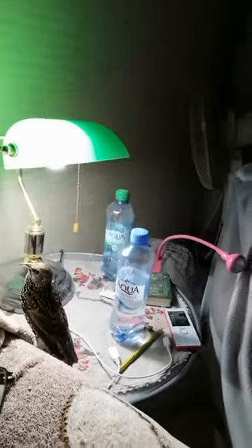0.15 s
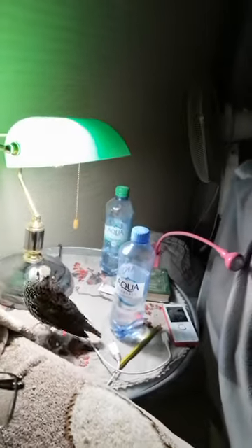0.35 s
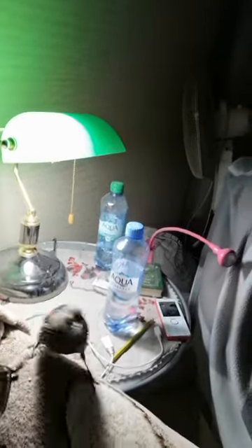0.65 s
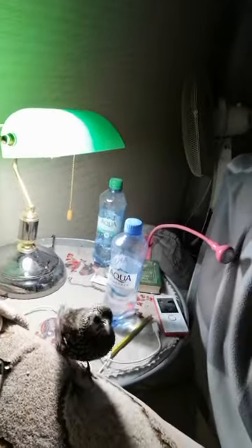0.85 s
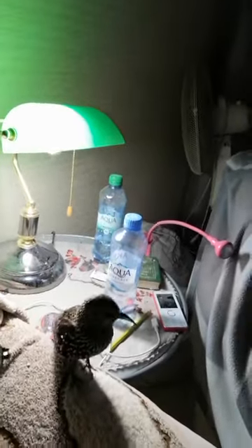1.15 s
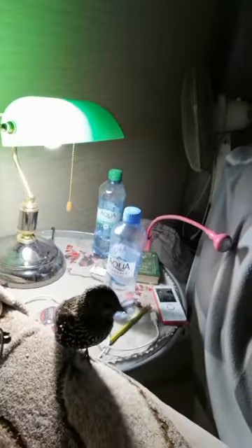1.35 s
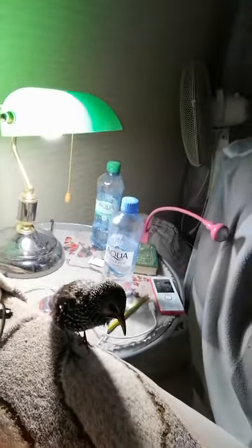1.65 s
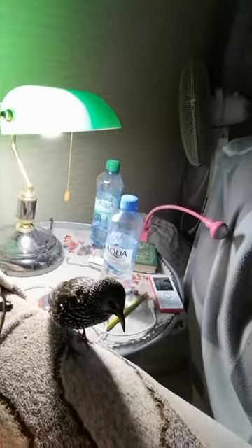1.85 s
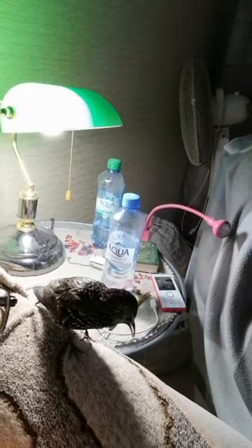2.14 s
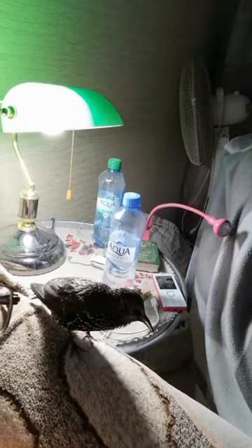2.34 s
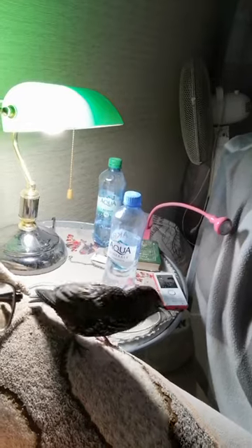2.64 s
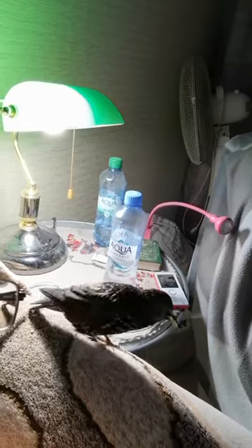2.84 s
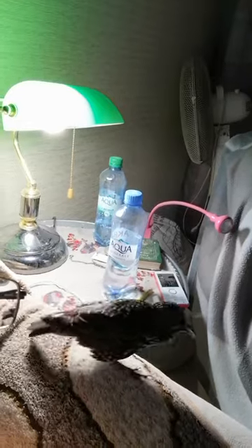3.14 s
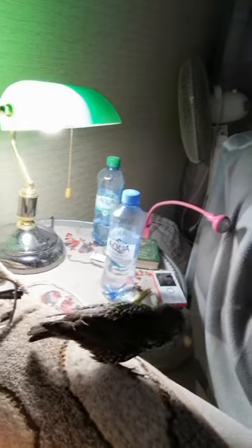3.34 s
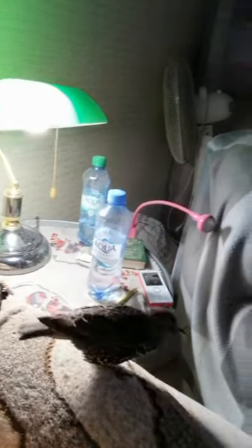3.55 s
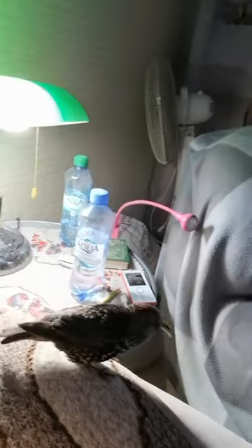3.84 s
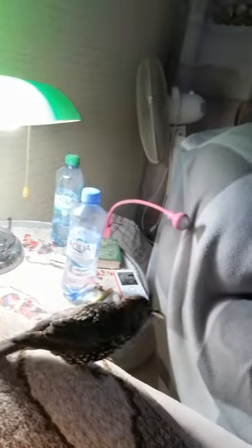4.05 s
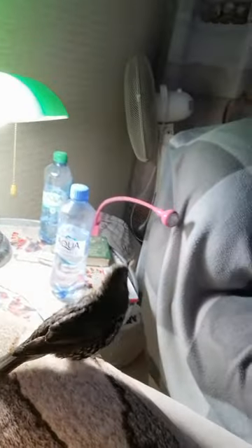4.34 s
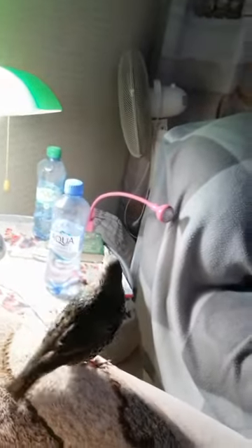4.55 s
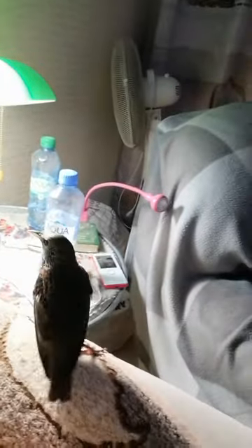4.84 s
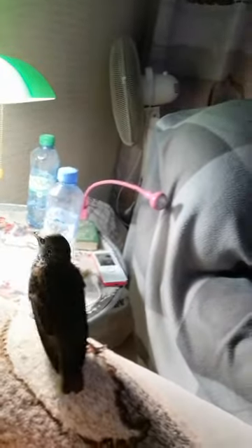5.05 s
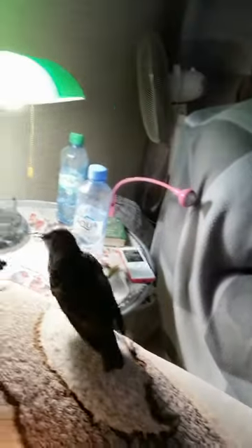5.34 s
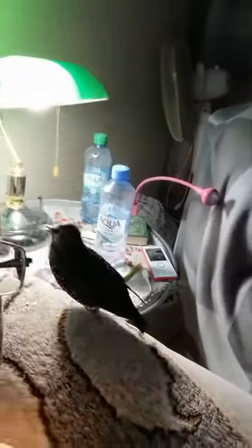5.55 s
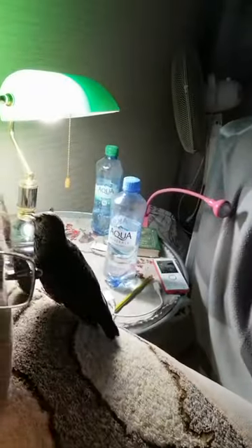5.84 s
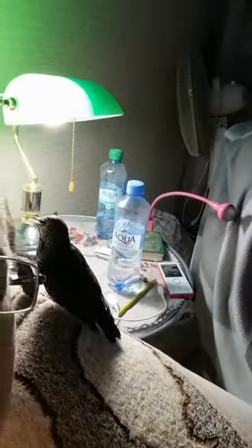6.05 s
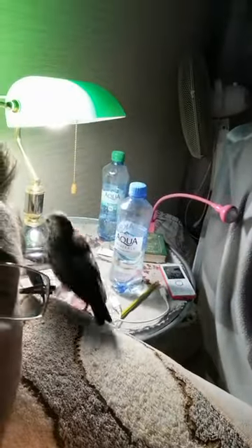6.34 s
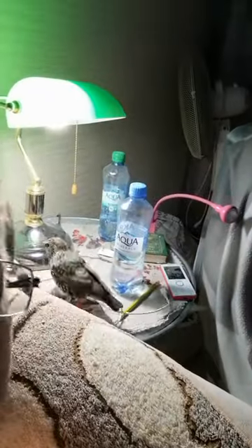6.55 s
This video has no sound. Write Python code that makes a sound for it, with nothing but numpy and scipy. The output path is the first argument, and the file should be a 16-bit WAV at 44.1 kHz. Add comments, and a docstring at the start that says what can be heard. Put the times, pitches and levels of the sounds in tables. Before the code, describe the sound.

A starling sings close to the microphone, toward the left, in a small furnished room with a brief echo and very faint hum. It starts with a fast run of falling chirps over raspy hiss, then husky slurs and spitting hisses until about 1 second. Two clear, high whistles follow at about 1.3 and 1.7 seconds. From 2 seconds come quick ticks, small pips and a low reedy babble, then a bright rising slur near 2.6. The loudest stretch, from about 2.7 to 4.5 seconds, is a string of rapid swooping warbles broken by short dry rattles. The song drops to soft hiss with a few ticks around 4.8. Two more warbles come at about 5.2 and 5.8 seconds, with a last rattle near 6. Thin, quiet, husky high glides trail on until about 6.8 seconds.

```python
"""A pet starling sings on a sofa arm in a small furnished room, close to the left microphone port.
The oscillating membrane of its syrinx, filtered by the throat, gives two long whistles, reedy babble and
seven warbles built of hooks, scoops, climbs, crests and soft undertones. Between them come husky slurs,
swept chirps and ticks, band-filtered hiss, and dry rattles whose puffs excite resonances of the beak.
The room hums faintly and reverberates briefly. Table levels are relative, before gains and filters."""
import sys
import numpy as np
from scipy import signal
from scipy.fft import rfft, irfft, next_fast_len
from scipy.io import wavfile
from scipy.ndimage import uniform_filter1d, map_coordinates

SR = 44100
rng = np.random.default_rng(int(sys.argv[2]) if len(sys.argv) > 2 else 0)


def file_out(sig):
    """Save sig as 16-bit WAV at sys.argv[1]."""
    # one column per channel
    cols = np.atleast_2d(sig).T
    # limit, then scale
    lim = np.clip(cols, -1, 1)
    pcm = np.round(lim * 32767).astype(np.int16)
    wavfile.write(sys.argv[1], SR, pcm)


N = 295459

# Contours of the two long whistles, each a list of: t/s, f/Hz, level/dB
WHISTLES = [
    [(1.343, 3330, -39), (1.357, 2963, -30.5), (1.379, 2827, -23.5), (1.447, 2730, -26.5),
     (1.513, 2790, -25.5), (1.521, 2927, -30.5), (1.561, 2970, -48), (1.57, 2980, -44)],
    [(1.665, 3300, -36), (1.677, 3120, -32.5), (1.703, 2820, -22.5), (1.729, 2720, -20),
     (1.803, 2619, -25.5), (1.855, 2708, -30), (1.885, 2675, -34.5), (1.905, 2920, -45)],
]
# Short arched pips: t/s, duration/s, top f/Hz, level/dB
PIPS = [(2.191, 0.0133, 2660, -37), (2.239, 0.014, 2874, -31.5), (2.289, 0.0142, 2800, -23.5),
        (2.419, 0.03, 7970, -37.5), (5.754, 0.034, 8620, -44)]
# Thin glides near the end: t/s, duration/s, start f/Hz, end f/Hz, level/dB
THIN_GLIDES = [(6.355, .14, 4564, 4400, -46.5), (6.358, 0.038, 3450, 3170, -53.5)]
def whistles():
    """Nearly sinusoidal oscillation: weak harmonics and little jitter give a pure tone."""
    notes = list(WHISTLES) + [arch(*row) for row in PIPS] + [slur(*row) for row in THIN_GLIDES]
    return amp(5.5) * syrinx(notes, [-38, -40], jitter=.002, jitter_rate=400, shimmer_db=.4)


# High hooks that open a warble, one (10070 Hz at 5.149 s) sounding an octave above the hook beside it: t/s,
# duration/s, start f/Hz, settled f/Hz, level/dB
HOOKS = [(1.974, 0.0105, 3250, 1784, -31), (2.499, 0.027, 5300, 3860, -36),
         (2.532, 0.044, 4190, 3710, -26.5), (3.276, 0.033, 5540, 3900, -34),
         (3.886, 0.02, 6380, 4640, -34.5), (3.901, 0.0261, 5330, 4070, -29),
         (5.14, 0.013, 6440, 5030, -29.5), (5.149, 0.057, 10070, 8100, -36.5),
         (5.149, 0.03, 4600, 4010, -31.5)]
# Diving scoops: t/s, duration/s, bottom f/Hz, end f/Hz, level/dB
SCOOPS = [(2.754, 0.032, 2020, 2600, -21), (2.842, .042, 2324, 2770, -23.5), (2.915, .014, 1670, 1990, -31),
          (3.085, 0.024, 1554, 3260, -27.5), (3.291, 0.03, 3070, 4250, -30.5),
          (3.359, .014, 2460, 2600, -25.5), (3.932, 0.024, 2355, 3380, -25.5),
          (3.942, 0.026, 1602, 2780, -22.5), (4.271, 0.025, 1747, 2650, -25.5),
          (5.18, 0.0191, 2190, 4000, -26), (5.199, 0.029, 1734, 2470, -22.5),
          (5.79, 0.015, 2345, 3350, -28.5), (5.805, 0.028, 1963, 2630, -26)]
# Loud rising notes: t/s, duration/s, start f/Hz, end f/Hz, level/dB
CLIMBS = [(2.787, 0.023, 2814, 3040, -20), (2.893, 0.0062, 2690, 3120, -22),
          (3.119, 0.031, 2450, 2950, -26.5), (3.198, 0.038, 2486, 2903, -26),
          (3.32, 0.012, 3175, 3440, -18.5), (3.381, 0.027, 2570, 2984, -25.5),
          (3.972, 0.024, 2644, 3196, -25), (3.996, .013, 3220, 3365, -21), (4.04, .014, 2510, 2620, -27),
          (4.064, 0.054, 2537, 2560, -40), (4.291, 0.047, 2620, 3350, -24.5),
          (4.339, 0.0095, 3280, 3460, -20), (4.39, 0.03, 2300, 2780, -28.5),
          (5.227, 0.0145, 2590, 2940, -24), (5.239, 0.0232, 3016, 3520, -17.5),
          (5.286, 0.0089, 2980, 2990, -22.5), (5.83, 0.032, 2722, 3330, -24),
          (5.9, 0.05, 2837, 2846, -37.5)]
# High turns between the climbs: t/s, duration/s, top f/Hz, level/dB
CRESTS = [(2.521, 0.017, 4180, -31), (2.738, 0.018, 4450, -45), (2.807, 0.011, 4000, -31),
          (3.15, 0.029, 3700, -32), (3.183, 0.021, 4200, -33), (3.311, 0.0094, 4150, -34),
          (3.924, 0.0094, 4690, -29), (3.991, 0.011, 4100, -35), (4.258, 0.019, 5800, -40),
          (4.416, 0.012, 3250, -31.5), (5.751, .036, 4300, -40)]
# Soft low notes after each main climb: t/s, centre f/Hz, level/dB
UNDERTONES = [(2.82, 1820, -40), (3.164, 1960, -40), (3.338, 1891, -39), (4.011, 2170, -38.5),
              (4.355, 2126, -32.5), (5.267, 2015, -41.5), (5.873, 1818, -43.5)]
def warbles(undertone_s=.027, undertone_rise=.06):
    """Frequency modulation: swift glides form the syllables, and jitter and buzz roughen them."""
    kinds = [(hook, HOOKS), (scoop, SCOOPS), (climb, CLIMBS), (arch, CRESTS)]
    notes = [shape(*row) for shape, rows in kinds for row in rows]
    for start, hz, db in UNDERTONES:
        half_rise = hz * undertone_rise / 2
        notes.append(climb(start, undertone_s, hz - half_rise, hz + half_rise, db))
    return amp(3.5) * syrinx(notes, [-23, -31], jitter=.018, jitter_rate=700, shimmer_db=1.37, buzz=.18)


# Low hooked notes: t/s, duration/s, start f/Hz, settled f/Hz, level/dB
BABBLE = [(2.156, 0.016, 1416, 776, -43), (2.209, 0.012, 1450, 834, -49), (2.249, 0.017, 1080, 692, -44.5),
          (2.332, 0.024, 1270, 1100, -55), (2.354, .01, 2010, 1610, -47), (2.366, .022, 2337, 870, -38.5),
          (2.382, 0.025, 902, 627, -44.5), (2.407, 0.0073, 656, 980, -40), (2.417, .012, 2510, 2110, -39),
          (2.424, 0.0364, 1480, 1064, -43.5), (2.486, 0.01, 900, 810, -51.5),
          (5.614, 0.0417, 3140, 2590, -45), (5.654, 0.022, 1295, 896, -45.5),
          (5.68, 0.035, 1047, 1132, -50.5), (5.792, 0.026, 1094, 832, -52.5)]
def babble():
    """Strong harmonics over a low, buzzing fundamental give a reedy timbre."""
    notes = [hook(*row) for row in BABBLE]
    return amp(4.5) * syrinx(notes, [-7, -14, -18], jitter=.018, jitter_rate=610, shimmer_db=3.5, buzz=.23)


# Husky glides: t/s, duration/s, start f/Hz, end f/Hz, level/dB
SLURS = [(0.169, 0.065, 5650, 5950, -35.5), (0.25, 0.066, 5180, 4620, -39), (0.294, .12, 3390, 3960, -40.5),
         (0.636, 0.096, 4500, 3120, -44.5), (0.714, 0.088, 3500, 3860, -42.5),
         (0.791, 0.088, 3400, 2960, -40.5), (1.247, 0.031, 7550, 7260, -48),
         (1.352, 0.2, 6130, 6000, -48.5), (1.571, 0.025, 7100, 5970, -40.5),
         (1.596, 0.066, 4500, 3400, -38.5), (1.729, 0.26, 5830, 3720, -52), (2.245, 0.1, 4900, 3610, -42.5),
         (2.576, 0.061, 4146, 4820, -23), (2.616, 0.06, 4920, 5020, -34.5), (3.061, .04, 5420, 4920, -35.5),
         (5.342, 0.14, 6600, 4390, -38.5), (5.55, 0.049, 8300, 7250, -44), (6.035, 0.47, 6300, 6050, -45.5),
         (6.287, 0.32, 6150, 6100, -49), (6.479, 0.34, 4250, 3920, -51.5)]
def husky_slurs():
    """Fast random frequency modulation broadens a tone into a narrow band of hiss."""
    notes = [slur(*row) for row in SLURS]
    return amp(3) * syrinx(notes, [-15], jitter=.0494, jitter_rate=1400, shimmer_db=3.5)


# Transfer function of the throat: f/Hz, gain/dB
VOCAL_TRACT = [(4500, 1), (7000, 4), (8400, 5), (9800, 3.5), (11000, -8), (12500, -9), (15000, -1)]
def song():
    """Source and filter: the throat weights the partials of the syrinx."""
    source = whistles() + warbles() + babble() + husky_slurs()
    return filtered(source, lambda hz: amp(along(VOCAL_TRACT, hz)))


BAND_LIMIT_HZ = 15650
def syrinx(notes, overtones_db, jitter, jitter_rate, shimmer_db, buzz=0):
    """A membrane oscillates in harmonics, fluctuating in frequency (jitter) and amplitude (shimmer)."""
    out = np.zeros(N)
    for note in notes:
        start, gate, (hz, db) = curves(note)
        n = len(hz)
        hz = hz * (1 + jitter * wobble(n, jitter_rate))
        flap = np.sin(phase_of(140 + 20 * wobble(n, 19.9)))  # a slow flap of the membrane makes the buzz
        phase = phase_of(hz * (1 + buzz * flap / 10))
        wave = np.sin(phase)
        for k, level in enumerate(overtones_db, 2):
            wave += amp(level) * np.sin(k * phase) * (k * hz < BAND_LIMIT_HZ)
        envelope = gate * amp(db + shimmer_db * wobble(n, 345.2))
        add(out, start, envelope * (1 + buzz * flap) * wave)
    return out


def syllable(start, length, db, pitch, tilt_db=0, gain_db=lambda u, hz: 0, attack_s=.001, release_s=.0028):
    """Attack, sloping hold and release of a note, as t/s, f/Hz, level/dB; u runs from 0 to 1."""
    u = np.linspace(0, 1, 80)
    t, hz = u * length, pitch(u)
    edges = np.clip(np.minimum(t / attack_s, (length - t) / release_s), .1, 1)
    level = db + tilt_db * (u - .5) + 20 * np.log10(edges) + gain_db(u, hz)
    return np.transpose([start + t, hz, level])


def hook(start, length, from_hz, settled_hz, db):
    """Exponential relaxation of pitch, with a time constant of a quarter of the note."""
    pitch = lambda u: settled_hz + (from_hz - settled_hz) * np.exp(-u / .25)
    return syllable(start, length, db, pitch, tilt_db=-4.5)


# Throat resonance that a scoop sweeps through: f/Hz, gain/dB
THROAT_RESONANCE = [(1500, -26), (2000, -12.5), (2500, -3), (3000, 4.5), (3400, -0.5), (4100, -9)]
def scoop(start, length, bottom_hz, end_hz, db, from_hz=4086, dive_share=.6):
    """Swept resonance: the pitch dives and turns up, and the note flares near the throat's peak."""
    height = lambda u: np.interp(u, [0, dive_share, 1], [1, 0, 1]) ** 1.6
    pitch = lambda u: bottom_hz * (np.where(u < dive_share, from_hz, end_hz) / bottom_hz) ** height(u)
    resonance = lambda u, hz: along(THROAT_RESONANCE, hz)
    return syllable(start, length, db, pitch, tilt_db=5.5, gain_db=resonance)


def climb(start, length, from_hz, to_hz, db):
    """Linear sweep: frequency and level rise together."""
    return syllable(start, length, db, lambda u: from_hz + (to_hz - from_hz) * u, tilt_db=3)


def arch(start, length, top_hz, db, sag=.128):
    """Parabolic sweep: the pitch rises to a top and sinks again."""
    return syllable(start, length, db, lambda u: top_hz * (1 - sag * (2 * u - 1) ** 2))


def slur(start, length, from_hz, to_hz, db, edge_db=-7.5):
    """Exponential sweep: an even glide, strongest in its middle."""
    pitch = lambda u: from_hz * (to_hz / from_hz) ** u
    return syllable(start, length, db, pitch, gain_db=lambda u, hz: edge_db * (2 * u - 1) ** 2)


# Opening run of falling chirps: start t/s, end t/s, period/s
TRILL_TIMING = (.037, .31, .0367)
# Each chirp of the run: start f/Hz, end f/Hz, duration/s
TRILL_SWEEP = (4240, 2060, .011)
# Ticks, very swift upward sweeps: centre t/s, level/dB, start f/Hz
TICKS = [(2.005, -26.5, 1597), (2.032, -28.5, 1780), (2.054, -31.5, 1340), (2.079, -34.5, 1190),
         (2.101, -44, 1130), (2.124, -36.5, 1350), (2.146, -41, 980), (4.811, -50, 2560),
         (4.847, -43.5, 2380), (4.877, -39.5, 2270), (4.907, -40.5, 2420), (4.939, -40, 2180),
         (5.403, -34, 2690)]
def chirps_and_ticks(tick_end_hz=4600, tick_s=.01, scatter_db=2, pop_db=-14):
    """Swept transients: each is one swift glide of the membrane, let go with a soft pop."""
    out = np.zeros(N)
    trill = [(t, -27.5 + scatter_db * rng.normal(), *TRILL_SWEEP) for t in np.arange(*TRILL_TIMING)]
    ticks = [(*row, tick_end_hz, tick_s) for row in TICKS]
    pop_spectrum = [(400, -18.5), (800, -5), (1500, -8.5), (4000, 5.5), (9000, -18), (12000, -70)]
    for centre, db, from_hz, to_hz, length in trill + ticks:
        n = int(length * SR)
        sweep = np.sin(phase_of(np.geomspace(from_hz, to_hz, n)))
        pop = amp(pop_db) * noise(pop_spectrum, n)
        add(out, int((centre - length / 2) * SR), amp(db + 4.5) * np.hanning(n) * (sweep + pop))
    return out


# Pulse trains: start t/s, end t/s, rate/Hz, first level/dB, middle level/dB, last level/dB
RATTLES = [(2.931, 2.992, 198, -28.5, -30.5, -32.5), (3.441, 3.49, 125, -28, -27.5, -30),
           (4.119, 4.168, 210.4, -22, -22.5, -21.5), (4.445, 4.495, 190, -21.5, -24, -28),
           (5.948, 6.028, 115, -28, -26.5, -23.5)]
# Noise spectrum of a rattle: f/Hz, level/dB
BEAK_SPECTRUM = [(530, -51), (900, -26.5), (1210, -73), (1420, -15.5), (1670, -25), (2070, -4.5),
                 (2420, -14.5), (2930, -5.5), (4600, -7), (6120, 3), (8150, -4), (9980, -7.5), (11000, -28),
                 (12400, -16), (15500, -34)]
def rattles(puff_sigma_s=.001, scatter_s=.0003, scatter_db=1):
    """Pulsed excitation: the syrinx snaps open; each puff sounds noise and two beak resonances."""
    puffs, t = np.zeros(N), np.arange(-SR // 250, SR // 250) / SR
    puff = np.exp(-.5 * (t / puff_sigma_s) ** 2)
    for start, end, rate, *levels in RATTLES:
        for centre in np.arange(start, end, 1 / rate):
            db = np.interp(centre, np.linspace(start, end, len(levels)), levels)
            db += scatter_db * rng.normal()
            add(puffs, int((centre + t[0] + scatter_s * rng.normal()) * SR), amp(db) * puff)
    modes = [(6150, .5), (8200, -22.5)]  # wandering resonances: f/Hz, level/dB
    ring = sum(amp(db) * np.sin(phase_of(hz * (1 + .026 * wobble(N, 250)))) for hz, db in modes)
    rush = shifting_resonances(noise(BEAK_SPECTRUM), depth_db=2.5)
    return amp(2) * puffs * (rush + amp(-5) * ring)


# Hiss spectra of the throat, the open beak and the top band: f/Hz, level/dB
THROAT_BAND = [(700, -55.5), (1800, -18.5), (2500, -11), (3300, 1), (4200, -6), (5300, 1), (6100, 0),
               (6800, -2.5), (7800, -24), (10000, -71)]
GAPE_BAND = [(5000, -66), (6600, -8), (7400, 8), (8400, 13), (10000, -2), (11000, -64), (14000, -39)]
TOP_BAND = [(8000, -25), (10500, 0.5), (12200, -2.5), (13500, -5.5), (15500, -11.5)]
# Sharp spits and softer swells: t/s, duration/s, throat level/dB, gape level/dB
SPITS = [(.25, 0.19, -39, -45), (.413, 0.095, -37, -42), (.525, 0.1, -38.5, -47.5), (.928, 0.098, -34, -41),
         (1.03, 0.096, -40.5, -48.5), (1.452, .14, -36, -47), (1.58, .14, -34, -44.5),
         (1.68, 0.18, -37.5, -47.5), (2.044, 0.092, -33.5, -42.5), (2.137, .12, -35.5, -47.5),
         (2.569, 0.17, -46, -45.5), (2.89, 0.16, -32.5, -44), (3.07, 0.17, -39.5, -42),
         (3.365, .19, -31.5, -43), (5.52, .13, -40.5, -56), (5.94, .15, -34, -36.5)]
SWELLS = [(-.05, 0.2, -34, -38.5), (.1, 0.24, -30.5, -35), (.635, 0.18, -46, -47.5),
          (.74, 0.25, -45.5, -56.5), (1.225, 0.15, -51.5, -56.5), (2.23, 0.32, -41.5, -50),
          (2.4, 0.22, -38, -46), (2.66, 0.47, -46.5, -52.5), (3.2, 0.21, -33.5, -35.5),
          (3.51, 0.26, -43, -43.5), (3.68, 0.22, -38.5, -46.5), (3.83, 0.29, -44.5, -46),
          (4.26, 0.25, -39.5, -42.5), (4.46, 0.21, -44, -47), (4.6, 0.25, -43, -46),
          (4.79, 0.19, -44.5, -48.5), (4.88, 0.29, -39.5, -43.5), (5.35, 0.2, -44.5, -43.5),
          (5.625, 0.13, -37.5, -42), (5.73, 0.27, -41, -43.5), (6.05, 0.2, -51.5, -72),
          (6.16, 0.21, -44.5, -48.5)]
def hiss(grain_db=.1, grain_rate=450):
    """Filtered noise in three bands of the throat and beak; the top band follows the gape."""
    out, t = np.zeros(N), np.arange(N) / SR
    bands = np.array([noise(THROAT_BAND), noise(GAPE_BAND), noise(TOP_BAND)])
    for rows, peak_share, top_db in [(SPITS, .24, -7.5), (SWELLS, .31, -17)]:
        for start, length, throat_db, gape_db in rows:
            on = (t > start) & (t < start + length)
            ramp = np.interp((t[on] - start) / length, [0, peak_share, 1], [0, 1, 0])
            rush = amp([throat_db, gape_db, gape_db + top_db]) @ bands[:, on]
            out[on] += np.sin(np.pi / 2 * ramp) ** 1.29 * rush
    return amp(1.5) * shifting_resonances(out, depth_db=5.5) * unit(amp(grain_db * wobble(N, grain_rate)))


def shifting_resonances(x, depth_db):
    """Time-varying filter: narrow resonances come and go swiftly as throat and beak move."""
    spectra = signal.stft(x, nperseg=512)[2]
    field = rng.standard_normal(spectra.shape)
    for _ in range(2):  # smooth over frequency, then time
        field = uniform_filter1d(uniform_filter1d(field, size=5, axis=0), size=8, axis=1)
    return signal.istft(spectra * unit(amp(depth_db * unit(field))), nperseg=512)[1][:N]


# Reverberation time of the furnished room: f/Hz, T60/s
REVERB_TIME = [(300, 0.24), (3000, 0.31), (7000, 0.49), (14000, 0.02)]
def room(x, echo_delay_s=.0075, echo_db=-3):
    """Reflection and reverberation: one echo from a nearby table, then an exponential decay per band."""
    hz, t, spectra = signal.stft(rng.standard_normal(SR // 2), SR, nperseg=256)
    decay = amp(-60 * t / along(REVERB_TIME, hz)[:, None])
    response = signal.istft(spectra * decay, SR, nperseg=256)[1]
    response /= np.linalg.norm(response)
    response[0] += amp(echo_db)
    return signal.fftconvolve(x, np.pad(response, (int(echo_delay_s * SR), 0)))[:N]


# Envelopes of the hum and the low room noise: t/s, level/dB
HUM_LEVEL = [(.5, -76.5), (.7, -69), (1.3, -70.5), (1.55, -75.5), (1.8, -71), (2.35, -65), (2.5, -87)]
RUMBLE_LEVEL = [(.3, -68.5), (.8, -65.5), (1.5, -64.5), (3.3, -68), (3.7, -72.5), (4.3, -78), (4.9, -66),
                (5.4, -72.5), (6.6, -61)]
# Spectrum of the still air: f/Hz, level/dB
AIR_SPECTRUM = [(13, -5), (22, 13), (76, -5), (489, -4.5), (1110, 4.5), (1460, -2), (3330, 10.5),
                (4630, 6.5), (5930, -26), (8480, -75), (10800, -47), (12400, -38), (15500, -47)]
def background(hum_hz=198):
    """A wavering hum and a rumble are coherent at both ports; faint air noise is incoherent."""
    t = np.arange(N) / SR
    hum = fader(HUM_LEVEL) * np.sin(2 * np.pi * hum_hz * t + .49 * wobble(N, 1.9))
    low_spectrum = [(25, 4), (70, -.5), (130, -7.5), (300, -10.5), (1000, -22), (3000, -25), (15000, -34.5)]
    rumble = fader(RUMBLE_LEVEL) * noise(low_spectrum)
    air = [amp(-66) * noise(low_spectrum) + amp(-62) * noise(AIR_SPECTRUM) for port in range(2)]
    return rumble + hum + np.array(air)


def amp(db):
    """Decibels to amplitude ratio."""
    return 10 ** (np.asarray(db) / 20)


def unit(x):
    """Normalisation to rms 1."""
    return x / np.sqrt(np.mean(x ** 2) + 1e-20)


def phase_of(hz):
    """Phase is the time integral of frequency."""
    return 2 * np.pi * np.cumsum(hz) / SR


def along(points, hz):
    """Interpolation of (f/Hz, value) points on a logarithmic frequency axis."""
    f, values = np.transpose(points)
    return np.interp(np.log(hz + 1), np.log(f + 1), values)


def fader(points):
    """Gain at every sample from (t/s, level/dB) points."""
    return amp(np.interp(np.arange(N) / SR, *np.transpose(points)))


def curves(rows):
    """First sample, soft gate and smoothly interpolated columns of a note."""
    times, *columns = np.transpose(rows)
    times = np.maximum.accumulate(np.maximum(times, 0))
    start = int(times[0] * SR)
    t = np.arange(start, int(times[-1] * SR) + SR // 500) / SR
    gate = np.clip(np.minimum(t - t[0], t[-1] - t) / .002, 0, 1)
    return start, gate, [uniform_filter1d(np.interp(t, times, c), size=110) for c in columns]


def add(track, start, x):
    """Superposition of x on the track from a sample on."""
    part = track[max(start, 0):][:len(x)]
    part += x[:len(part)]


def wobble(n, rate):
    """A random spline of n samples, with rate knots a second."""
    return map_coordinates(rng.standard_normal(int(n * rate / SR) + 4), [np.arange(n) * rate / SR])


def filtered(x, response):
    """Linear filtering: the spectrum of x times a frequency response."""
    n = x.shape[-1]
    padded = next_fast_len(n + 8192)
    return irfft(rfft(x, padded) * response(np.fft.rfftfreq(padded, 1 / SR)), padded)[..., :n]


def noise(spectrum, size=N):
    """Noise of rms 1, coloured by (f/Hz, level/dB) points."""
    return unit(filtered(rng.standard_normal(size), lambda hz: amp(along(spectrum, hz))))


# Shading of the right port: f/Hz, gain/dB
PORT_SHADOW = [(200, 5), (900, -4), (1600, 1), (2800, -9), (4000, -12), (6000, -19.5), (8500, -33),
               (12500, -14)]
# Change at the right port as the head turns: t/s, gain/dB
HEAD_TURN = [(0, -6), (1.8, -6.5), (2.3, -3.5), (2.8, -3), (3.25, -0.5), (3.9, -0.5), (4.35, 0.5),
             (4.8, -10), (5.25, -5), (5.85, 0.5), (6.7, -7)]
def scene(lag_s=.0001):
    """Acoustic shadow: the bird faces the left port; the right is shaded, later and more reverberant."""
    bird = song() + chirps_and_ticks() + rattles() + hiss()
    left = bird + amp(-11.5) * room(bird)
    right = amp(-1.5) * bird + amp(-6) * room(bird)
    shade_and_delay = lambda hz: amp(along(PORT_SHADOW, hz)) * np.exp(-2j * np.pi * hz * lag_s)
    right = filtered(right, shade_and_delay) * fader(HEAD_TURN)
    return np.array([left, right]) + background()


def record(dry):
    """Ideal low-pass filter: nothing passes above the band limit."""
    return filtered(dry, lambda hz: hz < BAND_LIMIT_HZ)


dry = scene()
out = record(dry)
file_out(out)
```